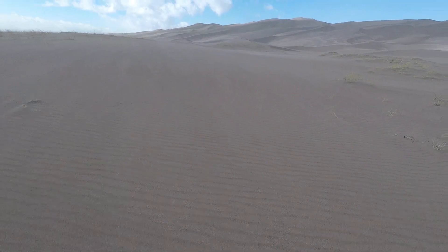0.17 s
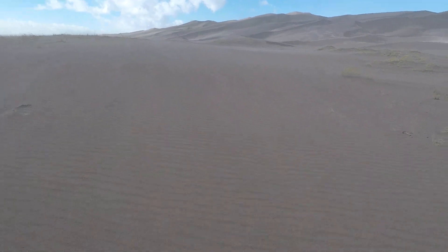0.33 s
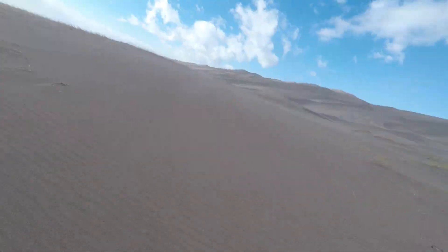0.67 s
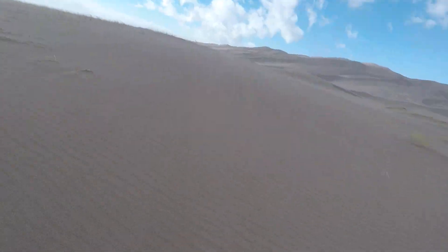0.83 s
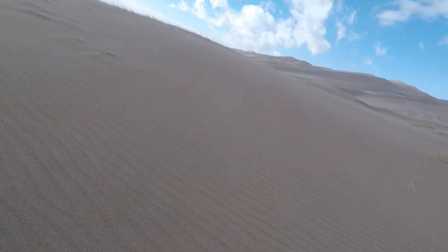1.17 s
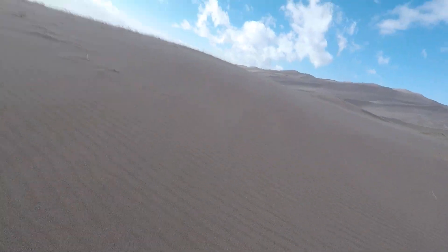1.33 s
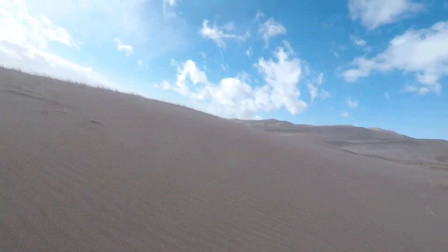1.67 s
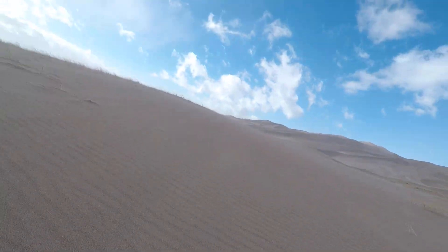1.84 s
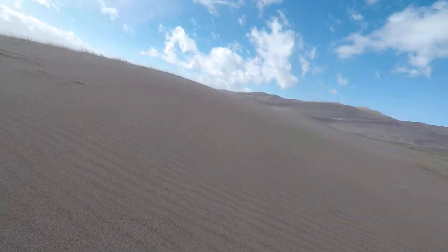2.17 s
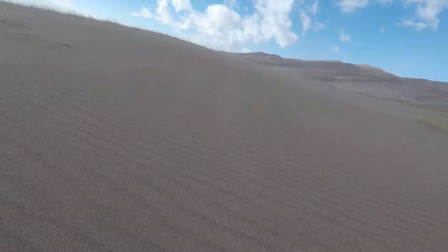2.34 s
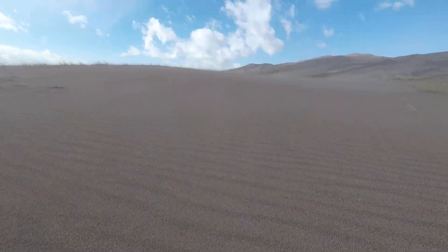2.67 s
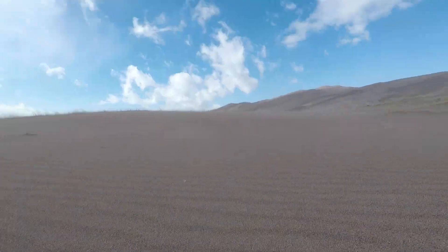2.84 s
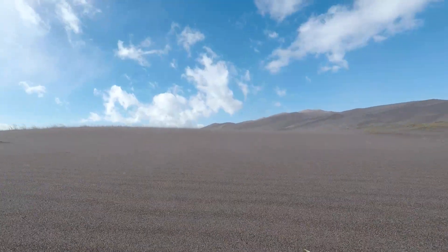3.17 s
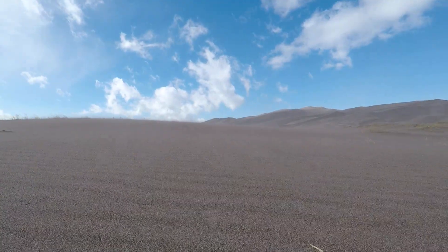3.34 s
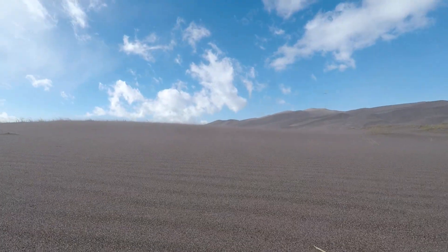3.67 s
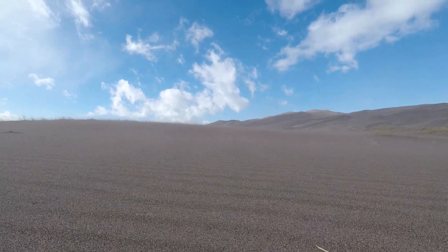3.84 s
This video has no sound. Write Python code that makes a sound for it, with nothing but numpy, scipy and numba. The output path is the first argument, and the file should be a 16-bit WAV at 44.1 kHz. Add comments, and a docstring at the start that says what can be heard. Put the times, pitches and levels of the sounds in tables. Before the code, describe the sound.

Close wind noise in an open dune landscape starts very faint, breaks into deep thuds and fluttering rumble after about a second, then roars hollowly over the microphone port, with fine sand ticking on the housing.

```python
"""Open dunes: gusty wind hits a small camera with one microphone port.
After a short silence the sound opens and swells. Eddies are low wobbling noise, thumps are sagging
low swings, and slow pressure swings are noise at the bottom of hearing. Air rushing past the port is
noise, steady and in puffs, that rings its cavity. Blown sand is grains and hiss on the housing.
The top treble is heard as wide stereo noise."""
import sys
import numpy as np
from scipy import signal
from scipy.fft import rfft, irfft
from scipy.io import wavfile
from scipy.ndimage import uniform_filter1d
from numba import njit

SR = 44100
rng = np.random.default_rng(int(sys.argv[2]) if len(sys.argv) > 2 else 0)


def makeup_ratio(level_db):
    """Linear amplitude ratio for a level in decibels (20 dB per factor of ten)."""
    decades = np.asarray(level_db, float) / 20
    return 10 ** decades


def log_audio(samples):
    """Write samples as a 16-bit WAV file to the path given in sys.argv[1]."""
    # one column per channel
    frames = np.atleast_2d(samples).T
    # limit to full scale, then quantise
    limited = np.clip(frames, -1, 1)
    pcm = np.round(limited * 32767).astype(np.int16)
    wavfile.write(sys.argv[1], SR, pcm)


N = 176400
START_S = 0.088  # silence before the sound opens

# Eddies that buffet the capsule: start_s, level_db, wobble_hz
EDDY_CURVE = [(0.09, -61, 90), (0.49, -48.5, 105), (0.55, -55, 92), (0.83, -60.5, 94), (0.88, -46, 104),
              (1.17, -58, 89.8), (1.23, -47, 166), (1.28, -18, 140), (1.31, -53, 123), (1.34, -36, 99.9),
              (1.39, -18.5, 126), (1.43, -36, 110), (1.47, -32, 106), (1.5, -56, 104), (1.58, -25, 122),
              (1.69, -48, 89.7), (1.73, -36.5, 113), (1.79, -12, 118), (1.83, -87, 106), (1.86, -13.5, 99),
              (1.91, -38.5, 101), (1.94, -19, 110), (1.97, -21.5, 112), (2.02, -56, 98), (2.06, -23, 102),
              (2.11, -31.5, 96), (2.16, -21.5, 117), (2.21, -36.5, 93), (2.33, -49, 95), (2.41, -14, 104),
              (2.46, -42, 89.7), (2.49, -43, 119),           (2.52, -11.5, 121), (2.55, -42, 106),
              (2.58, -14, 127), (2.65, -13, 98), (2.68, -14.5, 97.4), (2.75, -37.5, 96), (3.01, -37, 90),
              (3.04, -48, 104), (3.06, -16, 110), (3.07, -13.5, 101), (3.14, -34.5, 102), (3.26, -37, 91.7),
              (3.29, -31, 100), (3.36, -46, 91.7), (3.56, -44, 94.5), (3.61, -26, 102), (3.65, -43, 97),
              (3.72, -25, 110), (3.75, -33, 89), (3.81, -28.5, 118), (3.96, -13, 113), (4.0, -15.5, 85)]
EDDY_DAMPING, EDDY_LUMPS_DB, EDDY_LUMPS_HZ = 0.86, 3, 25.5

# Small eddies ring the body of the camera: pitch_hz, width_hz, level_db within the set
BODY_RINGS = [(172, 30, 4), (300, 93, 0), (396, 102, -4), (507, 350, -13)]
BODY_DB, BODY_RUSH_SHARE = -2.5, 0.55  # level offset; share in which it follows the rush, not the eddies

# Single thumps of air on the capsule: start_s, level_db, starting pitch_hz, push (+1) or pull (-1)
THUMP_LIST = [(0.371, -43, 90, 1), (0.392, -35, 69, -1), (0.472, -28.5, 111, -1), (0.642, -41, 81, -1),
              (0.929, -36, 70, -1), (.874, -27, 200, -1), (1.242, -9, 337, -1), (1.269, -7, 270, 1),
              (1.384, -6.5, 192, -1), (1.462, -5.5, 105, -1), (1.785, -13.5, 127, 1), (1.858, -9, 92, 1),
              (1.942, -6, 204, -1), (1.961, -8, 115, 1), (2.132, -8.5, 69.4, 1), (2.4, 1, 272, -1),
              (2.512, -18, 216, -1), (2.604, -4, 146, 1), (2.671, -4.5, 174, 1), (3.069, -4.5, 167, -1),
              (3.709, -10, 190, 1)]
THUMP_CYCLES = 8.3  # the length of this many starting cycles brings a 60 dB fall
THUMP_SAG_S, THUMP_RISE_S = 0.055, 0.0011

# Sudden puffs into the port: start_s, level_db
PUFF_LIST = [(0.774, -58.5), (0.875, -46.5), (1.205, -46), (1.242, -24), (1.269, -27), (1.38, -35),
             (1.459, -37.5), (1.569, -43), (1.852, -31.5), (1.889, -26.5), (1.931, -37), (2.055, -32.5),
             (2.149, -23.5), (2.4, -17), (2.513, -23.5), (2.588, -19.5), (2.646, -15.5), (2.668, -15.5),
             (3.055, -9.5), (3.708, -14)]
PUFF_T60_S = 0.03  # time to fall by 60 dB
PUFF_SLAP = 4.9  # a puff opens with a slap this many times its height

# Air rushing past the port, in three parts (light breeze, buffeting, hard gusts):
# start_s, level_db, upper cavity tones over lower_db, housing brightness_db
RUSH_PARTS = [
    [(0.09, -72, 8, -8), (0.214, -59.5, -1, -17), (0.274, -70.5, 5, -6), (0.388, -61.5, 1, -11),
     (0.418, -74, 11, -4), (0.462, -62.5, 9, -3), (0.525, -56, -2, 0), (0.55, -65.5, 2, -5.5),
     (0.67, -58.5, 3, -6.5), (0.73, -75.5, 12, 1), (0.748, -60.5, 0, -9), (0.862, -58, 1, -1.5),
     (0.882, -41.5, -12, -32), (0.898, -66, -2, -9), (0.975, -70.5, 5, -3), (1.0, -59.5, 4, -8),
     (1.224, -57.5, 3.5, -20), (1.244, -36, 5, -18), (1.256, -56, 7, -15), (1.272, -23.5, -6, -18),
     (1.29, -50, -1, -9), (1.362, -41.5, 1.5, -9.5), (1.386, -28.5, 2.5, -17.5), (1.396, -42, -7, -13),
     (1.5, -54, -7, -8)],
    [(1.55, -45, -3.5, -9), (1.762, -39.5, 1.5, -11), (1.828, -56.5, -8, -6), (1.858, -43, -3.5, -13.5),
     (1.916, -37, 2.5, -16.5), (1.95, -25.5, -22.5, -12.5), (1.98, -45.5, -1, -8.5),
     (2.042, -43.5, -3, -10), (2.062, -27.5, -11, -11), (2.1, -40.5, -6, -9.5), (2.256, -28, -7, -12.5),
     (2.284, -43, -6, -11), (2.394, -40, -4, -9), (2.402, -37, -0.5, -11.5), (2.456, -42.5, 1, -8),
     (2.514, -32.5, -14, -6), (2.548, -34, -5.5, -6.5), (2.672, -26.5, -3, -16.5), (2.698, -48.5, 5, -5.5),
     (2.962, -49.5, 7, 2), (3.053, -42, 21, 0.5)],
    [(3.057, -14, -2, -19.5), (3.071, -15.5, 8, -7.5), (3.083, -12.5, 10, -14), (3.093, -17.5, 9, -29),
     (3.103, -17.5, 6, -24), (3.113, -20, 5.5, -16), (3.295, -19, 1, -12), (3.343, -44.5, 9, 1.5),
     (3.415, -27, -1.5, -16.5), (3.515, -45, 6, -2), (3.701, -37.5, 7, -6.5), (3.709, -30, -6, -12.5),
     (3.731, -54, 20, 2), (3.765, -29, 7.5, -6.5), (3.873, -16.5, -1.5, -16), (3.925, -10.5, 0, -8.5),
     (3.975, -13.5, -4.5, -12.5), (4.0, -24.5, 16, -8)],
]
RUSH_FLUTTER_DB, RUSH_FLUTTER_HZ = 0.5, 58.4
RUSH_THROB_DB, RUSH_THROB_HZ = 1.5, 14
STEADY_FROM_DB, STEADY_SHARE = -30, 0.25  # from this level up, only this share of the unrest is left

# Lower tones of the port's cavity: pitch_hz, width_hz, level_db within the set
LOWER_RINGS = [(719, 250, 4), (1084, 192, 5)]
# Upper tones of the port's cavity: pitch_hz, width_hz, level_db within the set
UPPER_RINGS = [(1353, 313, -3), (1670, 232, 0.5), (1946, 174, -2), (2426, 295, -8)]
# Tones of the housing: pitch_hz, width_hz, level_db within the set
HOUSING_RINGS = [(2555, 164, 9), (3522, 365, 4.5), (4560, 270, 4), (5685, 454, 1.5), (9230, 1100, -21.5)]
TONE_PATCH_DB, TONE_PATCH_HZ = 3.5, 20.4  # each tone swells on its own

# Slow pressure swings of the wind on the capsule: start_s, level_db
SWAY_CURVE = [(0.1, -53.5), (0.15, -45.5), (1.25, -43), (1.28, -27.5), (2.35, -26), (2.39, -16),
              (3.48, -26), (4.0, -13)]
SWAY_LOW_HZ, SWAY_HIGH_HZ, SWAY_LUMPS_DB, SWAY_LUMPS_HZ = 8.0, 28.0, 1.5, 8.7

# Blown sand on the housing: start_s, level_db, top treble_db, lone grains against hiss_db
SAND_CURVE = [(0.6, -96, -13.5, -2), (1.14, -85, -12, 5), (1.38, -70.5, -22, 0.5), (1.43, -71.5, -7, -4),
              (1.95, -61.5, -18, -2.5), (1.98, -62, -9, -15), (2.23, -58.5, -12, -14),
              (2.25, -48.5, -35, 5.5), (2.28, -64.5, -7, -3), (2.37, -58.5, -18, 5.5), (2.47, -65, -4, -2),
              (2.52, -52, -17, -16), (2.65, -56, -12, 2.5), (2.7, -69.5, -10.5, 8), (3.13, -40.5, -10, -3),
              (3.84, -53, -2.5, 6), (3.94, -53, 3, -5), (3.97, -45, -5, -5)]
SAND_OVER_DB = 20.5  # added to the sand level
GRAINS_PER_S = 720  # before clumping
GRAIN_SPREAD_DB, CLUMP_DB, CLUMP_HZ, SAND_HISS = 2.5, 7.5, 39.5, 0.64

# Colour of the patter: pitch_hz, level_db
PATTER_COLOUR = [(180, -13), (300, -8.5), (694, -6), (1030, -1), (1250, -3.5), (1600, -10), (2230, -25),
                 (2500, -4.5), (3100, -15), (4520, -3), (4910, -10), (5880, -4), (7650, -14.5),
                 (8720, -10.5), (11000, -27.5), (12500, -25.5), (15200, -31)]

# The loudest grains, each a short skid: start_s, level_db
TICK_LIST = [(1.0003, -58), (1.1328, -59), (1.1737, -55.5), (1.1874, -58), (1.2082, -56), (2.7586, -37),
             (2.77, -45), (2.7829, -34), (2.8025, -34), (2.817, -33), (2.8807, -31.5), (2.937, -45)]
TICK_OVER_DB, TICK_S, TICK_LOW_HZ = 16.0, 0.0015, 2500  # added level; fading time; lowest pitch

# The wide top treble: lowest pitch; level added to the top; level of the stereo noise in it
TOP_LOW_HZ, TOP_OVER_DB, TOP_SIDE_DB = 12200, 15.5, 6.5

EVEN_S, EVEN_SHARE = 0.0412, 1  # window and share for holding down the chance swell of narrow noise


def rms_one(x):
    """Scale to an average strength (rms) of 1."""
    return x / np.sqrt(np.mean(x ** 2) + 1e-20)


def in_time(rows):
    """Draw straight lines between the rows: each column becomes a curve with one value a sample."""
    s, *columns = np.transpose(rows)
    return [np.interp(np.arange(N) / SR, s, c) for c in columns]


def drift(rate_hz):
    """Slow random wandering with rms 1, drawn at every 20th sample."""
    r = np.exp(-40 * np.pi * rate_hz / SR)
    slow = signal.lfilter([1], [1, -2 * r, r * r], rng.standard_normal(N // 20 + 1001))
    slow = slow[1000:]  # skip the filter's start
    return np.interp(np.arange(N) / 20, np.arange(len(slow)), rms_one(slow))


def butter(x, hz, kind, order=2):
    """Butterworth filter: keep the low, high or middle pitches."""
    return signal.sosfilt(signal.butter(order, hz, kind, fs=SR, output="sos"), x)


def evened(x):
    """Hold down the chance swell of a narrow noise by dividing by its recent and coming strength."""
    x = rms_one(x)
    power = uniform_filter1d(x * x, int(EVEN_S * SR)) + 1e-3
    return rms_one(x / power ** (EVEN_SHARE / 2))


def tones(x, table, loose=1):
    """Side-by-side resonances of alternating sign, each swelling; white noise comes out near rms 1."""
    out, power = 0, 0
    for k, (hz, width_hz, db) in enumerate(table):
        r = np.exp(-np.pi * width_hz / SR)
        ring = signal.lfilter([1 - r, 0, r - 1], [1, -2 * r * np.cos(2 * np.pi * hz / SR), r * r], x)
        swell = makeup_ratio(db + loose * TONE_PATCH_DB * drift(TONE_PATCH_HZ))
        out = out + (-1) ** k * swell * ring
        power += makeup_ratio(db) ** 2 * np.pi * width_hz / SR
    return out / np.sqrt(power)


def colour(x, spectrum):
    """Filter to the given spectrum, with no sound ahead of its cause (minimum phase)."""
    hz, db = np.transpose(spectrum)
    grid = np.linspace(1, SR / 2, 1025)
    cepstrum = irfft(np.interp(np.log(grid), np.log(hz), db) * np.log(10) / 20)
    # fold the backward half onto the forward half
    cepstrum[1:1024] *= 2
    cepstrum[1025:] = 0
    return signal.fftconvolve(x, irfft(np.exp(rfft(cepstrum))))[:N]


@njit
def wobble(x, step, damping):
    """A moving resonance, then the same one as a low-pass."""
    out, low, band, low2, band2 = np.zeros(len(x)), 0., 0., 0., 0.
    for i in range(len(x)):
        band += step[i] * (x[i] - low - damping * band)
        low += step[i] * band
        band2 += step[i] * (band - low2 - damping * band2)
        low2 += step[i] * band2
        out[i] = low2
    return out


def eddies():
    """A low wobble whose pitch follows the size of the eddy; smaller eddies ring the body."""
    db, hz = in_time(EDDY_CURVE)
    noise = wobble(rng.standard_normal(N), 2 * np.pi * hz / SR, EDDY_DAMPING) / np.sqrt(hz)
    buffet = makeup_ratio(db + EDDY_LUMPS_DB * drift(EDDY_LUMPS_HZ)) * evened(noise)
    rush_db = in_time(np.vstack(RUSH_PARTS))[0]
    body_db = BODY_DB + (1 - BODY_RUSH_SHARE) * db + BODY_RUSH_SHARE * rush_db
    body = tones(makeup_ratio(body_db) * rng.standard_normal(N), BODY_RINGS)
    return buffet + butter(body, 650.0, "low", order=4)


def thumps():
    """Each thump is a few low swings that sag in pitch and die."""
    out, t = np.zeros(N), np.arange(SR // 5) / SR
    for s, db, hz, sign in THUMP_LIST:
        turns = hz * THUMP_SAG_S * (1 - np.exp(-t / THUMP_SAG_S))
        fade = makeup_ratio(db - 60 * t * hz / THUMP_CYCLES)
        rise = 1 - np.exp(-t / THUMP_RISE_S)
        out[int(s * SR):][:len(t)] += np.sign(sign) * fade * rise * np.sin(2 * np.pi * turns)
    return out


def puffs():
    """Strength of the bursts of turbulence at the port: sudden, with a quick decay."""
    burst, t = np.zeros(N), np.arange(SR // 5) / SR
    for s, db in PUFF_LIST:
        burst[int(s * SR):][:len(t)] += makeup_ratio(db - 60 * t / PUFF_T60_S)
    return burst


def rush(burst):
    """Fluttering turbulence, steady and in puffs, rings the cavity and housing tones."""
    db, upper_db, bright_db = in_time(np.vstack(RUSH_PARTS))
    # strong flow flutters and throbs less
    loose = np.interp(db, [STEADY_FROM_DB - 10.0, STEADY_FROM_DB], [1, STEADY_SHARE])
    unrest_db = RUSH_FLUTTER_DB * drift(RUSH_FLUTTER_HZ) + RUSH_THROB_DB * drift(RUSH_THROB_HZ)
    air = (makeup_ratio(db + loose * unrest_db) + burst) * rng.standard_normal((2, N))
    air = air + PUFF_SLAP * np.maximum(np.diff(burst, prepend=0), 0)
    lower = tones(air[0] * makeup_ratio(-upper_db / 2), LOWER_RINGS, loose)
    upper = tones(air[1] * makeup_ratio(upper_db / 2), UPPER_RINGS, loose)
    housing = tones(air[0] * makeup_ratio(bright_db), HOUSING_RINGS, loose)
    cavity = butter(butter(lower + upper, 933.0, "high"), 2460.0, "low")
    return cavity + butter(housing, 1300.0, "high")


def sway():
    """Slow pressure swings: smooth, slightly lumpy noise at the bottom of hearing."""
    db, = in_time(SWAY_CURVE)
    noise = butter(rng.standard_normal(N + SR), [SWAY_LOW_HZ, SWAY_HIGH_HZ], "band")[SR:]
    swings = makeup_ratio(db + SWAY_LUMPS_DB * drift(SWAY_LUMPS_HZ)) * evened(noise)
    return butter(swings, 55.0, "low", order=4)


def sand():
    """Clumped grains of uneven size over fine hiss, with short skids for the loudest grains."""
    db, top_db, lone_db = in_time(SAND_CURVE)
    clumps = makeup_ratio(CLUMP_DB * drift(CLUMP_HZ))
    sizes = makeup_ratio(GRAIN_SPREAD_DB * np.minimum(rng.exponential(1, N), 4)) * rng.choice([-1, 1], N)
    grains = rms_one(sizes * (rng.random(N) < GRAINS_PER_S * clumps / SR))
    noise = rng.standard_normal((2, N))
    hits = makeup_ratio(db + SAND_OVER_DB) * (makeup_ratio(lone_db) * grains + SAND_HISS * noise[0])
    ticks = np.zeros(N)
    for s, tick_db in TICK_LIST:
        ticks[int(s * SR)] = makeup_ratio(tick_db + TICK_OVER_DB)
    skids = signal.lfilter([1], [1, -np.exp(-1 / (TICK_S * SR))], ticks) * noise[1]
    patter = colour(hits + butter(skids, TICK_LOW_HZ, "high"), PATTER_COLOUR)
    return wide_top(patter, top_db, noise[1])


def wide_top(patter, top_db, noise):
    """Stereo noise fills the top treble, following its strength, with opposite sign left and right."""
    body = butter(patter, TOP_LOW_HZ, "low", order=8)
    top = butter(patter, TOP_LOW_HZ, "high", order=8)
    side = butter(np.abs(top) * makeup_ratio(TOP_SIDE_DB) * noise, TOP_LOW_HZ, "high", order=8)
    return body + makeup_ratio(top_db + TOP_OVER_DB) * (top + side * [[1], [-1]])


def scene():
    """All wind sounds meet at the one port; the top treble sounds wide in stereo."""
    wind = eddies() + thumps() + rush(puffs()) + sway()
    return (wind + sand()) * (np.arange(N) > START_S * SR)


def band_limit(x):
    """A steep low-pass at the top of the band."""
    return signal.sosfilt(signal.butter(12, 15400, fs=SR, output="sos"), x)


def record(dry):
    """Peaks are rounded off softly and the top of the treble is cut."""
    rounded = 1.046 * np.tanh(dry / 1.449)
    mix = butter(rounded, 15400, "low", order=12)
    return band_limit(mix)


dry = scene()
out = record(dry)
log_audio(out)
```